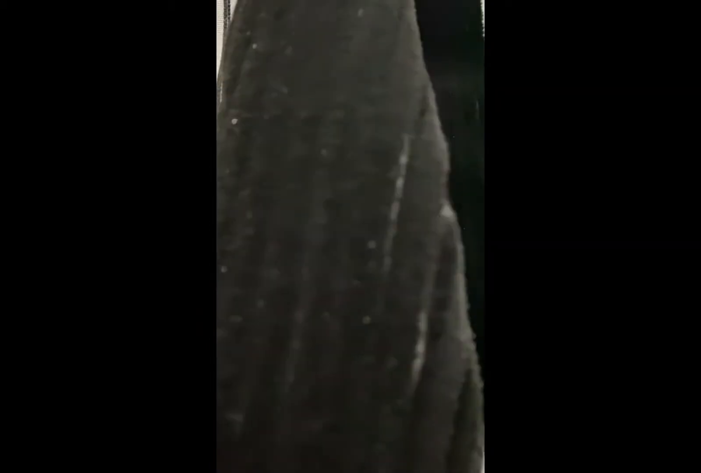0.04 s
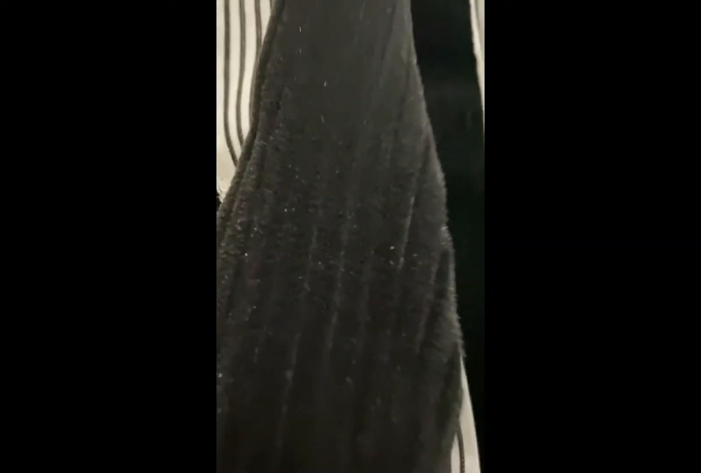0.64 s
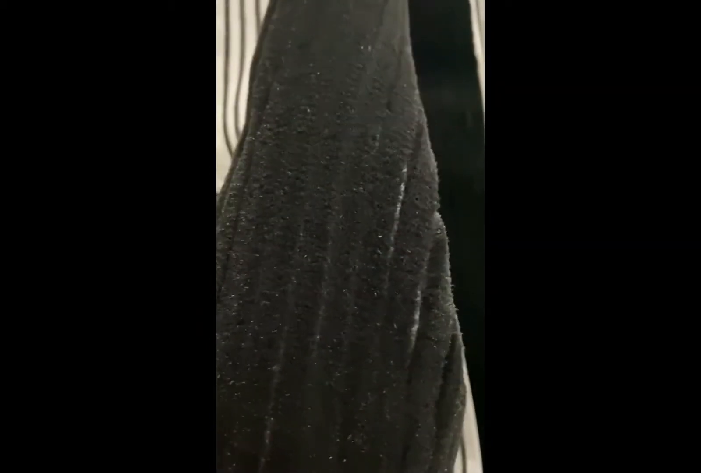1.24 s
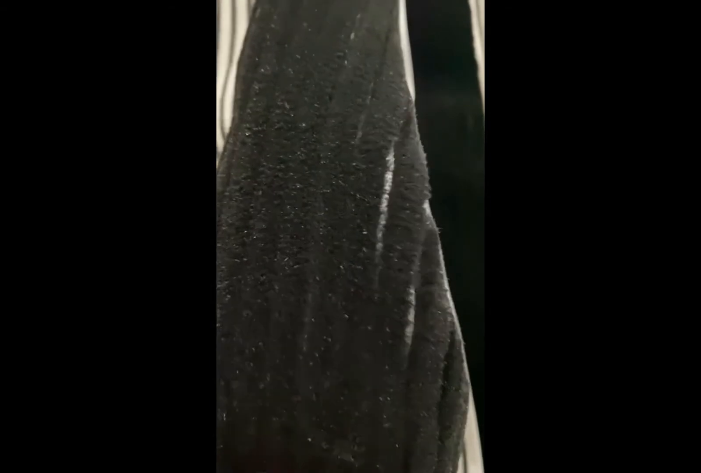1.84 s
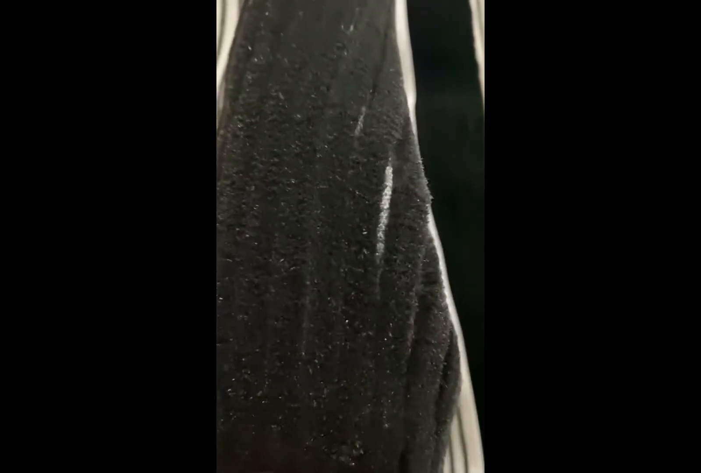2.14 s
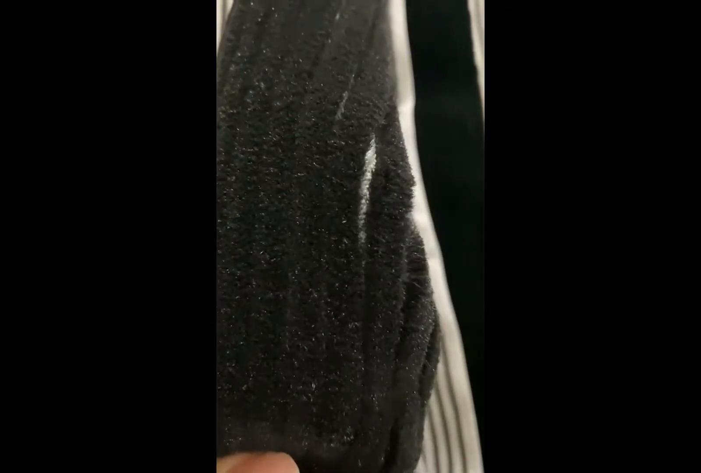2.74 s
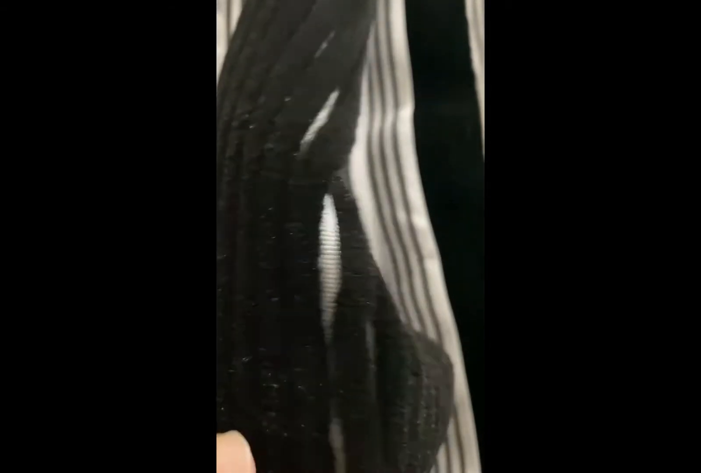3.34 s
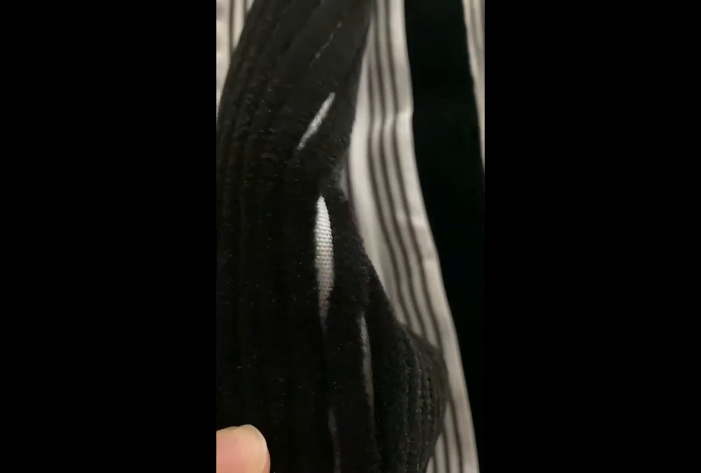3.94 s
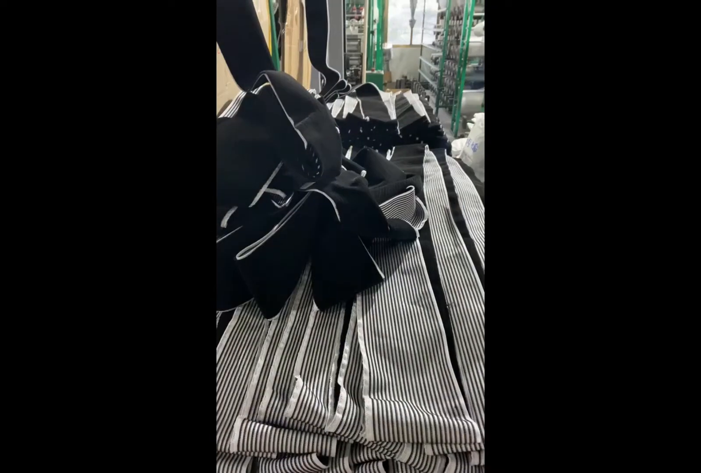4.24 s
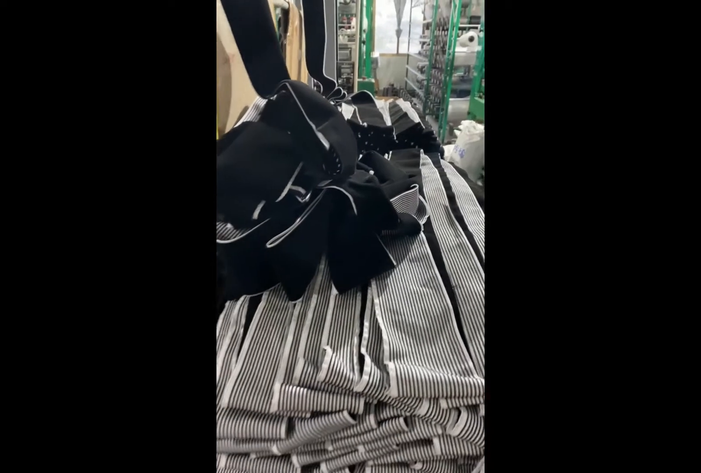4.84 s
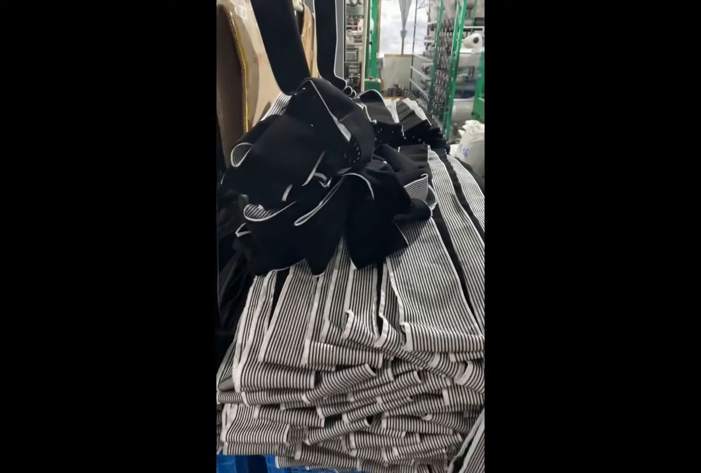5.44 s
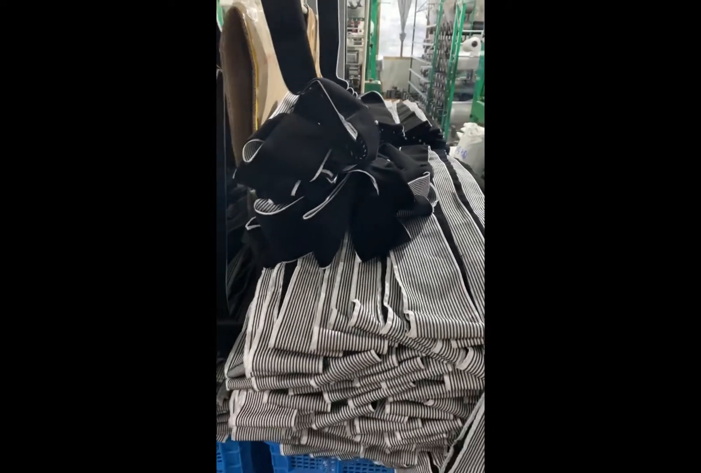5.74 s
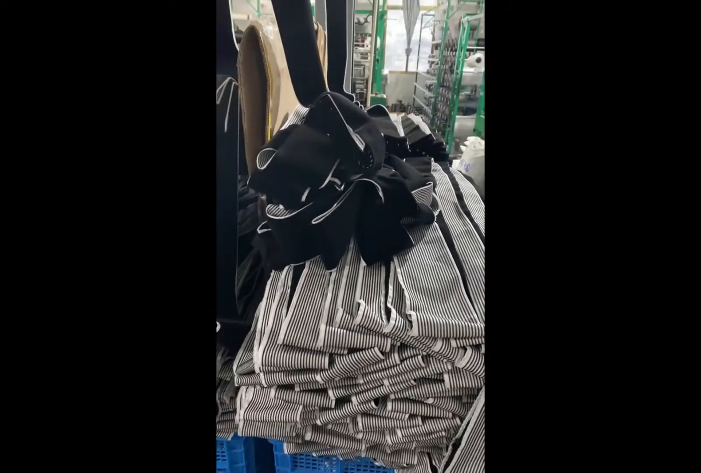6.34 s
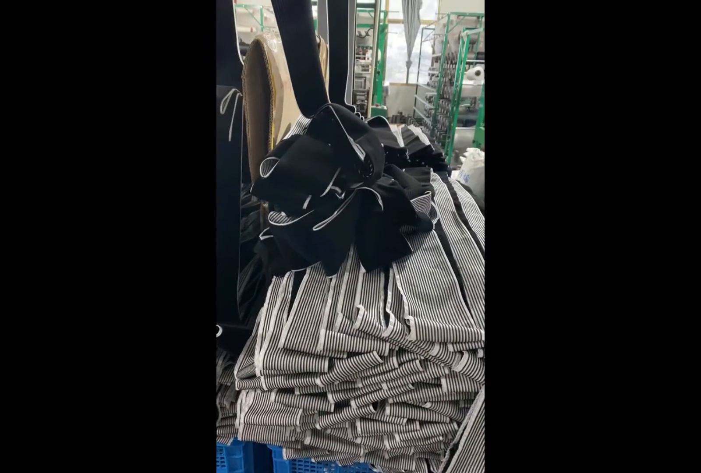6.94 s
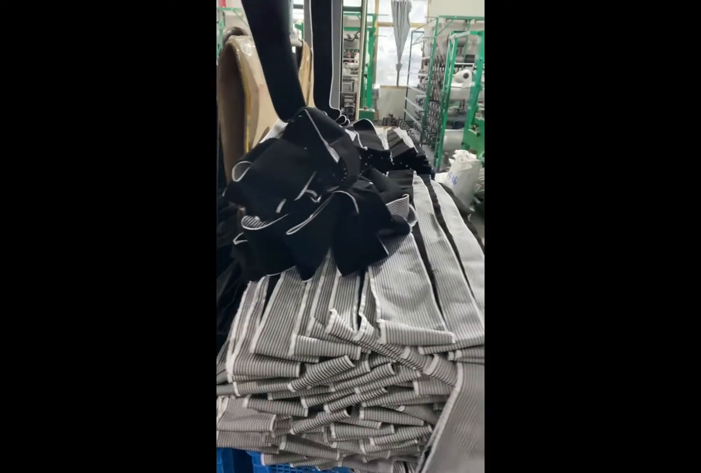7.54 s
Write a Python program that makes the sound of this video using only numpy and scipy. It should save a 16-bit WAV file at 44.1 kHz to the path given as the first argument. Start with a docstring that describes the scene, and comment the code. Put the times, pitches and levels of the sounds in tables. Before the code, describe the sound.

Close to the microphone, a circular knitting machine runs with a low throbbing drone, fast regular knocking, metallic clatter and a needle hiss that pulses in quick swells. Steel parts ring faintly now and then. About halfway through, the sound cuts to a brief silence. Then a whole textile hall roars, with a louder, brighter hiss and a thin high whine. Near the end its low drone sinks a little while the machines keep running.

```python
"""A knitting mill at work, heard from two spots in turn.
First, close to a circular knitting machine, its drive drones and knocks, its cams clatter, steel
parts resonate and its needles hiss in quick swells. At about 4 s comes a short silence.
Then, out on the floor, the whole hall roars and hisses, brighter, with a thin whine.
Near the end the hall's drone sinks."""
import sys
import numpy as np
from scipy import signal
from scipy.fft import rfft, irfft, next_fast_len
from scipy.io import wavfile
from scipy.ndimage import uniform_filter1d, map_coordinates

SR = 44100
rng = np.random.default_rng(int(sys.argv[2]) if len(sys.argv) > 2 else 0)


def unload_audio(sound):
    """Save the sound as a 16-bit wav file, at the path given as the first command line argument."""
    columns = np.transpose(np.atleast_2d(sound))
    # keep every value between -1 and 1, then stretch to whole-number steps
    steps = np.round(np.clip(columns, -1, 1) * 32767)
    wavfile.write(sys.argv[1], SR, steps.astype(np.int16))


N = 339570
TIME = np.arange(N) / SR
NEAR_END_S, HALL_START_S = 4.022, 4.131
TURN_HZ, HALL_TURN_HZ = 7.042, 3.294  # rotation of the near drive and the hall's loudest drive

# Likeness of the left and right noise: (frequency [Hz], coherence [0-1])
NEAR_COHERENCE = [(60, 1), (160, .997), (280, .985), (420, .85), (560, .4), (1000, .28), (2000, .55),
                  (4600, .38), (5350, .75), (6100, .58), (6600, 1)]
HALL_COHERENCE = [(1000, 1), (10000, 1)]
# Noise that repeats with each turn: (frequency [Hz], share of power [0-1])
NEAR_PERIODIC = [(200, .08), (400, .2), (650, .3), (1200, .14), (2200, .02)]
HALL_PERIODIC = [(130, .22), (400, .15), (700, .1), (1500, .01)]


def near_machine(song):
    """Amplitude modulation: the turning cylinder pulses the hiss, and the cams flutter."""
    turning_db = swell(6.42, peak_s=2.075) + .45 * swell(3.21, peak_s=2.09) + .3 * wobble(11)
    needles = near_needles(turning_db)
    flutter_db = .7 * swell(2 * TURN_HZ, peak_s=2.034) + .3 * swell(TURN_HZ, peak_s=2.04)
    flutter_db += .3 * wobble(45)
    # Steel resonances: (frequency [Hz], bandwidth [Hz], level [dB])
    resonances = [(872, 25, -50), (972, 30, -49), (1066, 25, -50), (1315, 30, -53), (1975, 50, -55),
                  (2085, 25, -57), (2290, 25, -55.5), (2490, 30, -56), (2548, 25, -57), (2605, 25, -58),
                  (3495, 40, -59), (3775, 35, -56), (5660, 40, -59)]
    steel = amp(.4 * flutter_db + .4 * turning_db) * (rings(resonances, waver_db=2.1) + song)
    return filtered(needles + cams(flutter_db) + near_drive(), stereo_spread) + steel


def near_needles(turning_db):
    """Incoherent summation: hundreds of needles merge into one hiss."""
    # Hiss spectrum: (frequency [Hz], density level [dB])
    spectrum = [(2500, -85), (4200, -74.3), (4650, -75.7), (5050, -71.5), (5600, -71.2), (6400, -73.5),
                (8500, -75.3), (10600, -71.3), (11800, -73.8), (12400, -70.5), (14100, -71.5),
                (15400, -75.5)]
    # Swells and dips of the hiss: (time [s], level [dB])
    accents = [(.05, 2.4), (.28, -1.2), (.84, 1), (1.14, 2.2), (3.38, -1), (3.62, 1.2)]
    level_db = .95 * turning_db + humps(accents, half_s=.04) + .3 * wobble(40)
    return amp(level_db) * rush(spectrum, NEAR_COHERENCE, patchy_db=2)


def cams(flutter_db):
    """Impact noise: dense contacts at the cams blend into a clatter."""
    # Clatter spectrum: (frequency [Hz], density level [dB])
    spectrum = [(350, -80), (680, -55.2), (900, -61), (1250, -64), (1700, -68), (2100, -66.5),
                (2600, -63.7), (3300, -68.5), (3680, -68), (3900, -73), (4500, -75), (8000, -100)]
    contacts = churn(TURN_HZ, NEAR_PERIODIC)
    return amp(flutter_db - .3) * rush(spectrum, NEAR_COHERENCE, patchy_db=1.6, noise=contacts)


def near_drive():
    """Forced vibration: the rotating drive rumbles, hums, knocks and drones."""
    # Rumble spectrum: (frequency [Hz], density level [dB])
    spectrum = [(20, -75), (30, -61), (42, -45.8), (70, -45.7), (110, -46.8), (180, -48.6), (270, -47.6),
                (325, -50.3), (400, -48.8), (480, -51.2), (540, -54.5), (700, -59.5), (1200, -90)]
    # Motor and gear tones: (frequency [Hz], level [dB])
    tones = [(62.2, -40), (67.8, -39), (77.5, -41), (105.6, -36.5), (115.4, -39.5), (216, -41),
             (246.5, -39), (302.8, -39), (331, -41), (372.9, -40.5), (422.5, -42), (563.4, -47),
             (598.6, -48)]
    rumble = rush(spectrum, NEAR_COHERENCE, patchy_db=.5, noise=churn(TURN_HZ, NEAR_PERIODIC))
    return rumble + hum(tones, waver_hz=2.51) + knocks(scatter_db=1.5) + drone(rest_db=-30.2)


def knocks(scatter_db, attack_s=.005):
    """Impulse response: the blows of each turn excite damped modes of the frame and casing."""
    # Blows of one turn: (time [s], frame level [dB], casing level [dB])
    pattern = [(2.0092, -21.8, -24.3), (2.0354, -15.8, -31), (2.0592, -10.6, -18.7), (2.1009, -15.2, -17.6)]
    # Modes of each body: (frequency [Hz], level [dB], 60 dB decay time [s])
    frame = [(281.7, 1.2, .11), (410, -19, .12)]
    casing = [(99, -2.2, .17), (151.6, -.5, .2)]
    t = np.arange(SR // 3) / SR
    turns_s = np.arange(-16, 16) / TURN_HZ
    onset = 1 - np.exp(-t / attack_s)
    out = np.zeros(N)
    for s, frame_db, casing_db in pattern:
        ringing = sum(amp(body_db + db - 60 * t / t60) * np.sin(2 * np.pi * hz * t)
                      for body_db, modes in [(frame_db, frame), (casing_db, casing)]
                      for hz, db, t60 in modes)
        times = s + turns_s
        strengths = amp(scatter_db * rng.standard_normal(len(times)))
        blows = np.bincount((times[times > 0] * SR).astype(int), strengths[times > 0], N)
        out += signal.fftconvolve(blows, onset * ringing)[:N]
    return out


def drone(rest_db, pitch_hz=257.8):
    """Amplitude modulation: a motor's tone throbs at uneven moments."""
    # Throbs and lulls: (time [s], level [dB])
    throbs = [(.06, -5), (.27, 8), (.6, 8), (.9, 6), (1.08, -8), (1.6, 3), (2.02, 3), (2.31, 7), (2.55, 2),
              (2.76, 7), (4.0, 6), (4.38, 6), (4.62, 5), (4.9, 6), (5.78, 5), (6.37, 4), (6.77, 8)]
    return amp(humps(throbs, half_s=.09)) * hum([(pitch_hz, rest_db)])


def singing_steel(half_s=.065):
    """Resonance: steel parts sing out briefly, each on one slightly unsteady pitch."""
    # Bursts of tone: (time [s], frequency [Hz], level [dB])
    bursts = [(.33, 3790, -51), (.35, 2575, -43.5), (.41, 2480, -45), (.7, 2555, -42), (.83, 2550, -43),
              (.98, 2610, -44), (1.04, 2665, -46), (1.75, 2585, -48), (1.91, 3775, -48), (2.45, 2495, -44),
              (2.6, 3780, -52), (3.0, 3770, -52), (3.32, 2495, -42), (3.47, 2290, -44), (3.56, 2470, -44),
              (3.79, 2560, -46.5), (3.84, 3775, -46), (4.49, 2535, -35), (7.23, 2190, -40)]
    jitter_rad = .5 * wobble(45)
    return sum(np.sqrt(2) * amp(db) * bell(TIME, s, half_s) * np.sin(2 * np.pi * hz * TIME + jitter_rad)
               for s, hz, db in bursts)


def hall(song, top_hz=14120):
    """Superposition: many machines add up to a roar that opens with a brief surge."""
    surge_db = 1.1 * (1 - ramp(TIME, start=4.48, length=.22))
    machines = hall_needles() + hall_clatter(song) + hall_drives()
    return filtered(amp(surge_db) * machines, lambda hz: hz < top_hz)


def hall_needles():
    """Beating: two machines at slightly different speeds pulse the hiss in and out of step."""
    # Hiss spectrum: (frequency [Hz], density level [dB])
    spectrum = [(2500, -77.5), (4200, -64), (6000, -62.5), (8400, -63.5), (9500, -62.5), (11000, -62.5),
                (12500, -61.0), (13600, -61.5)]
    # Flares and dips of the hiss: (time [s], level [dB])
    flares = [(6.81, 1.2), (6.9, -.9), (7.18, -.7)]
    beat_db = .45 * swell(6.22, peak_s=5.838) + .5 * swell(6.86, peak_s=5.945)
    level_db = beat_db + humps(flares, half_s=.03) - .2 + .23 * wobble(18)
    return amp(level_db) * rush(spectrum, HALL_COHERENCE, patchy_db=1.5)


def hall_clatter(song, fade_db_per_s=.1):
    """Attenuation with distance: clatter and ringing fade slightly as the microphone backs away."""
    # Clatter spectrum: (frequency [Hz], density level [dB])
    spectrum = [(350, -77), (600, -51.8), (690, -49.8), (790, -51), (950, -55.3), (1200, -54.8),
                (1600, -58.5), (2000, -57), (2350, -60), (3100, -61.5), (4500, -68.5), (8000, -88)]
    # Steel resonances: (frequency [Hz], bandwidth [Hz], level [dB])
    resonances = [(1165, 35, -42.5), (1420, 40, -46), (2003, 60, -45), (2552, 35, -39.5), (9790, 6, -42)]
    clatter = rush(spectrum, HALL_COHERENCE, patchy_db=1.3, noise=churn(HALL_TURN_HZ, HALL_PERIODIC))
    steel = clatter + rings(resonances, waver_db=1.5) + song
    return amp(.35 * wobble(30) - fade_db_per_s * (TIME - HALL_START_S)) * steel


def hall_drives():
    """Forced vibration: the hall's motors rumble and hum, and their drone sinks near the end."""
    # Rumble spectrum: (frequency [Hz], density level [dB])
    spectrum = [(20, -69), (30, -60.5), (42, -47.6), (65, -45.8), (130, -43.7), (165, -44.3), (186, -49),
                (205, -49), (228, -45.5), (255, -46.3), (290, -45.6), (330, -47), (385, -46.6),
                (480, -50.7), (590, -53), (700, -55), (1200, -86)]
    # Motor and gear tones: (frequency [Hz], level [dB])
    tones = [(65.8, -32.8), (105.9, -38), (131.8, -33), (191.1, -37), (241.5, -35), (250.4, -35.5)]
    # Swells of the roar: (time [s], level [dB])
    swells = [(5.47, 1.3), (6.37, 1.5)]
    rumble = rush(spectrum, HALL_COHERENCE, patchy_db=.6, noise=churn(HALL_TURN_HZ, HALL_PERIODIC))
    motors = rumble + hum(tones, waver_db=1.3) + chugging()
    droning = drone(rest_db=-32.5) + amp(-35) * ring(centre_hz=248, width_hz=12)
    sinking_db = -9 * ramp(TIME, start=6.85, length=.5)
    return amp(humps(swells, half_s=.1)) * (motors + amp(sinking_db) * droning)


def chugging(turn_hz=7.32, depth_db=5):
    """Periodic modulation: one machine's gear tone and frame resonance swell with every turn."""
    gear = hum([(372.9, -35.5)], drift_rad=.2)
    frame = amp(-38) * ring(centre_hz=385, width_hz=50)
    return amp(depth_db * swell(turn_hz, peak_s=5.929)) * (gear + frame)


def hum(tones, waver_db=1, drift_rad=.25, waver_hz=2.5):
    """Rotational harmonics of shafts and gears: changing load modulates their level and phase."""
    out = np.zeros(N)
    for hz, db in tones:
        peak = np.sqrt(2) * amp(db + waver_db * wobble(waver_hz))
        phase = 2 * np.pi * (hz * TIME + rng.random()) + drift_rad * wobble(waver_hz)
        out += peak * np.sin(phase)
    return out


def rings(resonances, waver_db):
    """Random excitation: rattled steel parts ring in narrow bands that swell and fade."""
    return sum(amp(db + waver_db * wobble(6)) * ring(hz, width) for hz, width, db in resonances)


def ring(centre_hz, width_hz):
    """A second-order resonator driven by white noise, scaled to rms 1."""
    response = lambda hz: 1j * hz * width_hz / (centre_hz ** 2 - hz ** 2 + 1j * hz * width_hz)
    return unit(filtered(rng.standard_normal(N), response))


def churn(turn_hz, periodic):
    """Partial periodicity: countless contacts make white noise, and a share recurs every turn."""
    size = round(SR / turn_hz)
    one_turn = unit(irfft(np.exp(2j * np.pi * rng.random((2, size // 2 + 1))), size))
    share = lambda hz: np.clip(along(periodic, hz), 0, 1)
    recurring = filtered(one_turn[:, np.arange(N) % size], lambda hz: np.sqrt(share(hz)))
    return recurring + filtered(rng.standard_normal((2, N)), lambda hz: np.sqrt(1 - share(hz)))


def rush(spectrum, coherence, patchy_db, noise=None):
    """Spectral shaping of two-channel noise; narrow patches of colour come and go as parts ring."""
    cells = signal.stft(rng.standard_normal((2, N)) if noise is None else noise, nperseg=1024)[2]
    patches = uniform_filter1d(rng.standard_normal(cells.shape[1:]), size=3, axis=0)
    patches = unit(uniform_filter1d(patches, size=5, axis=1))
    pair = signal.istft(cells * amp(patchy_db * patches), nperseg=1024)[1][:, :N]
    angle = lambda hz: np.arccos(np.clip(along(coherence, hz), 0, 1)) / 2
    response = lambda hz: amp(along(spectrum, hz)) * [np.cos(angle(hz)), np.sin(angle(hz))]
    mid, side = filtered(unit(pair) * np.sqrt(SR / 2), response)
    return np.array([mid + side, mid - side])


def stereo_spread(hz):
    """Left and right differ in phase and level; treble bands sound alternately wide and centred."""
    # Stereo balance: (frequency [Hz], left minus right level [dB])
    balance = [(130, 0), (440, -1.5), (650, 1), (1000, 4), (1800, 2.2), (3000, .1)]
    # each half turn of phase flips the treble between wide and centred
    first_hz, spacing_hz, width_hz = 6080, 2980, 1150
    flips = [ramp(hz, first_hz + k * spacing_hz - width_hz / 2, width_hz) for k in range(4)]
    midrange_rad = .55 * (hz > 500) + 2.3 * bell(hz, 2850, 700)  # one band of the cams is very wide
    left_lead_rad = midrange_rad * (1 - flips[0]) + np.pi * sum(flips)
    return np.exp(np.outer([.5j, -.5j], left_lead_rad)) * amp(np.outer([.5, -.5], along(balance, hz)))


def swell(rate_hz, peak_s):
    """Sinusoidal modulation by a turning part, with a crest at peak_s."""
    return np.cos(2 * np.pi * rate_hz * (TIME - peak_s))


def humps(rows, half_s):
    """A level curve with one Gaussian hump for each (time [s], level [dB]) row."""
    return sum(db * bell(TIME, s, half_s) for s, db in rows)


def bell(x, centre, half_width):
    """A Gaussian that falls to 1/e at half_width from its centre."""
    return np.exp(-((x - centre) / half_width) ** 2)


def ramp(x, start, length):
    """A linear rise from 0 to 1."""
    return np.clip((x - start) / length, 0, 1)


def wobble(rate):
    """A smooth random curve, rate knots a second."""
    return map_coordinates(rng.standard_normal(1024), [TIME * rate + 2], mode="wrap")


def filtered(x, response):
    """Linear filtering: the spectrum of x times a complex response."""
    size = next_fast_len(N + 8192)
    return irfft(rfft(x, size) * response(np.fft.rfftfreq(size, 1 / SR)), size)[..., :N]


def along(points, hz):
    """Interpolation of (frequency [Hz], value) points on a log axis."""
    knots_hz, values = np.transpose(points)
    return np.interp(np.log(hz + 1), np.log(knots_hz), values)


def amp(db):
    """Decibels to gain."""
    return 10 ** (np.asarray(db) / 20)


def unit(x):
    """Scale to rms 1."""
    return x / np.sqrt(np.mean(x ** 2))


def scene():
    """Hard gating: the near machine, a short silence, then the hall."""
    song = singing_steel()
    return near_machine(song) * (TIME < NEAR_END_S) + hall(song) * (TIME > HALL_START_S)


def record(dry):
    """Band limiting: a steep low-pass removes the highest treble."""
    cutoff_hz = 15700
    return filtered(dry, lambda hz: 1 / (1 + (hz / cutoff_hz) ** 200))


dry = scene()
out = record(dry)
unload_audio(out)
```